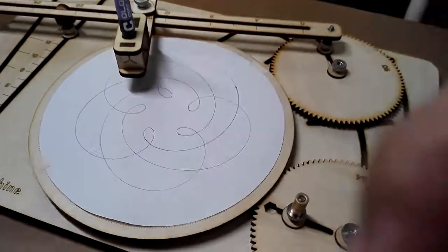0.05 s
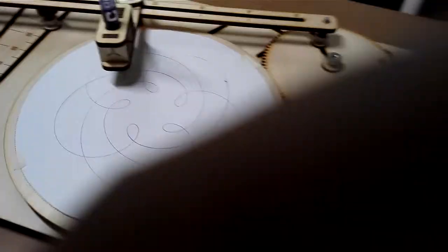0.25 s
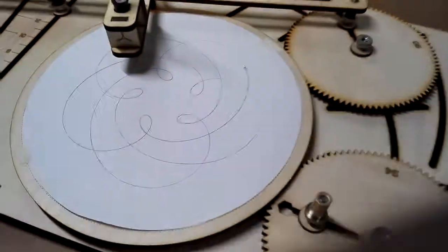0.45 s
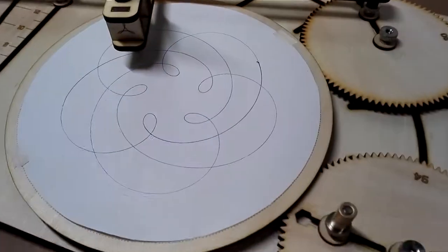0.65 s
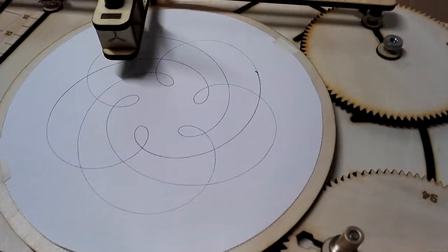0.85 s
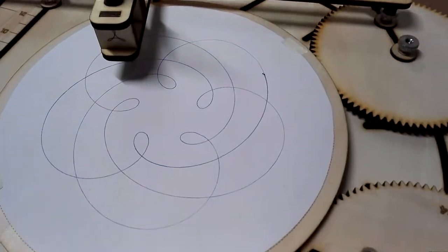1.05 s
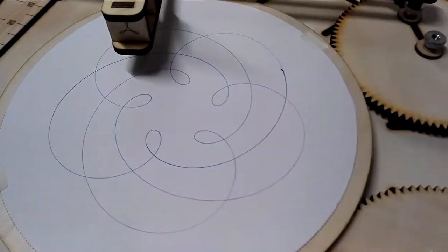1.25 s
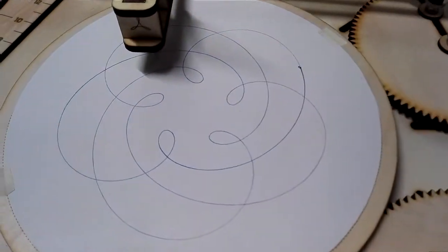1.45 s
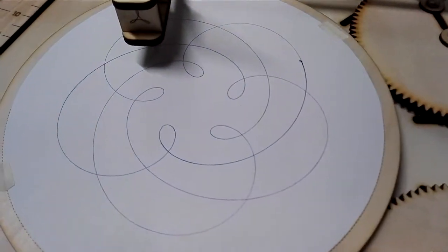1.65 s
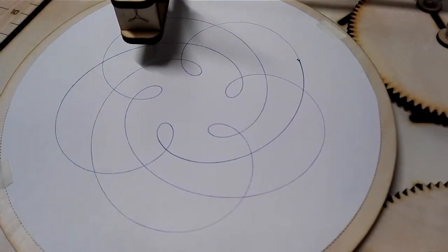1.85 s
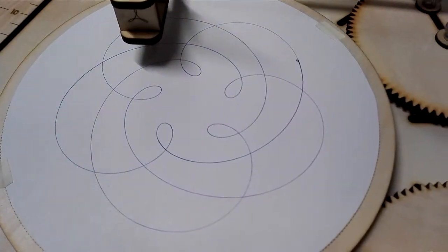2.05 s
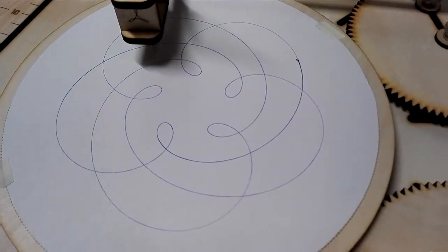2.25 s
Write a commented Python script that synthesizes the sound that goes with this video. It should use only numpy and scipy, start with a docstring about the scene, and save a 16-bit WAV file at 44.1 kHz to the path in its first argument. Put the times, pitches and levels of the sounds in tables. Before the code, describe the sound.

Close handling noise on a camera opens with a light brush, then a firm scrape with sharp clicks, a soft thump and more brushing, louder on the right. It soon gives way to the steady hiss of a quiet room.

```python
"""A quiet room, where a hand takes hold of a camera. Skin brushes and scrapes the case beside the
right microphone port (its opening), making noise out of many tiny slips. The case clicks, thumps
and rattles. The left port hears the hand later and duller, because the sound must go round the case.
Behind it all: hiss, room murmur, a low hum, a thin electrical whine, rumble, a faint throb and squeak."""
import sys
import numpy as np
from scipy import signal
from scipy.fft import rfft, irfft, next_fast_len
from scipy.io import wavfile
from scipy.ndimage import uniform_filter1d, map_coordinates

SR = 44100
rng = np.random.default_rng(int(sys.argv[2]) if len(sys.argv) > 2 else 0)


def persist_wave(psi):
    """Save psi, clipped to +-1, as 16-bit WAV."""
    counts = np.round(np.clip(psi, -1, 1) * 32767).astype(np.int16)
    wavfile.write(sys.argv[1], SR, np.atleast_2d(counts).T)


N = 101429
T = np.arange(N) / SR

# Tone colours of the background noises. Each row: frequency in Hz, relative level in dB.
MIC_HISS_COLOUR = [(30, -10), (150, -3), (450, -3.5), (800, -1.5), (1400, -1.5), (2500, -2.5), (3800, -3.5),
                   (5000, -7), (8500, -8.5), (12000, -12.5), (14000, -15)]
MURMUR_COLOUR = [(60, -10), (150, 0), (200, 2), (265, 5), (330, -3), (600, -3), (1000, 1), (1600, -2),
                 (2500, -13), (6000, -30)]
RUMBLE_COLOUR = [(8, 5.5), (25, 0), (50, 0), (72, -14), (98, -8), (140, -22), (260, -27), (450, -45),
                 (2000, -75)]
# The tones of the hum and whine. Each row: pitch in Hz, average level in dB.
HUM_AND_WHINE = [(119, -77), (257, -94), (3543, -83), (3601, -97), (7087, -101)]
# How the rumble and the throb rise and fall. Each row: time in seconds, level in dB.
RUMBLE_LEVELS = [(0, -66), (.2, -69), (.42, -75.5), (.65, -70), (.83, -73), (1.2, -78), (2.1, -76),
                 (2.3, -78)]
THROB_LEVELS = [(0, -69), (.2, -71), (.4, -80), (.65, -70), (.72, -80), (.83, -75), (1.2, -88), (1.47, -77),
                (1.75, -71), (1.87, -66.5), (2.02, -79), (2.13, -73), (2.3, -85)]
# Light brushes of skin. Each row: start, rise, hold and fade in seconds, then hiss level and
# hollow body level in dB.
BRUSHES = [(.202, 0.0074, .018, .027, -35, -46.5), (0.423, .006, .027, 0.055, -48.5, -61.5),
           (0.483, 0.034, 0.022, 0.022, -50.5, -73), (.54, .018, .015, 0.056, -44.5, -65.5),
           (.85, .04, .01, .07, -76, -105), (1.41, 0.038, .02, .06, -74, -105)]
# The firm scrape. Each row: time in seconds, body level in dB, hiss level in dB.
SCRAPE_LEVELS = [(.272, -115, -115), (.28, -58, -58), (.295, -48, -47), (.312, -46, -43), (.328, -40, -38),
                 (.342, -31.5, -28.5), (.355, -26, -24.5), (.36, -30, -28), (.365, -25, -24),
                 (.371, -34, -28), (.385, -42, -31), (.391, -58, -51), (.41, -115, -115)]
# Tone colours of the rubbing skin. Each row: frequency in Hz, relative level in dB.
BRUSH_HISS_COLOUR = [(500, -45), (2000, -27), (2700, -11), (4200, -4.5), (5800, 0), (6800, -4), (9000, -4),
                     (11000, -14), (12500, -21.5), (14500, -22)]
BRUSH_BODY_COLOUR = [(200, -27), (500, -20), (800, -6.5), (1120, -15), (1550, -0.5), (2000, -12),
                     (2500, -7), (3800, -5), (8000, -22)]
SCRAPE_BODY_COLOUR = [(60, -55), (160, -34), (290, -17), (450, -22), (720, -14), (850, -15), (1170, 0),
                      (1300, -7), (1390, -1), (1520, -5), (1680, 3), (1830, -5), (2050, -1), (2380, 1),
                      (2800, -13), (5000, -30)]
SCRAPE_HISS_COLOUR = [(100, -60), (400, -32), (1500, -13), (3000, -7), (3900, 0), (4400, -2.5), (5100, 2),
                      (6000, -3), (7500, -10), (10000, -18), (12000, -23), (14000, -21)]
# Clicks of the case. Each row: start in seconds, peak in dB, then centre, width and treble limit in Hz,
# then rattle level, thump peak and the click's extra level towards the left port in dB.
CLICKS = [(.2720, -8.5, 5440, 4150, 9260, -28, -40, -3), (0.3193, -12.5, 4400, 5500, 9500, -56, -60, 4),
          (0.3625, -11, 1600, 2400, 6000, -60, -75, -5), (0.4068, -14.5, 1120, 800, 3200, -70, -90, -1),
          (0.5072, -21, 5200, 1200, 6860, -62, -34.5, 0), (0.521, -37, 5200, 700, 7000, -81, -80, -3)]
# Where the rattling case rings. Each row: pitch in Hz, width in Hz, gain in dB.
CASE_RINGS = [(1200, 600, -3), (2099, 600, 1), (3730, 495, -1), (5136, 290, 3), (6342, 900, -4),
              (7384, 700, -9)]
# How the way round the case dulls the sound. Each row: frequency in Hz, gain in dB.
CASE_SHADOW = [(40, 0), (200, -2), (700, -4), (1200, -13), (2400, -15), (3200, -8), (3900, -5), (5200, -17),
               (7000, -25), (10000, -26), (14000, -23)]


def undb(db):
    """Turn decibels into a gain to multiply by."""
    return 10 ** (np.asarray(db) / 20)


def unit(x):
    """Scale a sound to an average (rms) level of 1."""
    return x / np.sqrt(np.mean(x ** 2))


def curve(rows):
    """Join rows of seconds and dB into one gain curve for each level column."""
    times, *levels = np.array(rows).T
    return [undb(np.interp(T, times, db)) for db in levels]


def swell(start, rise, hold, fade, db):
    """A gain that rises, holds and fades softly; times are in seconds."""
    rising = np.clip((T - start) / rise, 0, 1)
    fading = np.clip(1 - (T - start - rise - hold) / fade, 0, 1) ** 1.5
    return undb(db) * rising * fading


def decay(start, fall_s):
    """A gain that jumps to 1, then falls to about a third every fall_s seconds."""
    return (T >= start) * np.exp(-np.maximum(T - start, 0) / fall_s)


def colour(x, points):
    """Filter a sound through rows of Hz and dB."""
    size = next_fast_len(2 * N, True) // 2 * 2
    hz, db = np.array(points).T
    freqs = np.maximum(np.arange(size // 2 + 1) * SR / size, 1)
    gains = undb(np.interp(np.log(freqs), np.log(hz), db))
    cepstrum = irfft(np.log(gains))
    # Folding it in half makes the filter ring only after a sound, never before.
    cepstrum[1:size // 2] *= 2
    cepstrum[size // 2 + 1:] = 0
    return irfft(rfft(x, size) * np.exp(rfft(cepstrum)))[:N]


def resonate(x, hz, width):
    """Let a sound ring around one pitch, with gain 1 at the centre."""
    angle = 2 * np.pi * hz / SR
    damping = np.sin(angle) * width / hz / 2
    return signal.lfilter([damping, 0, -damping], [1 + damping, -2 * np.cos(angle), 1 - damping], x + 1e-18)


def lowpass(x, hz):
    """Soften the treble above hz."""
    return signal.sosfilt(signal.butter(4, hz, fs=SR, output="sos"), x + 1e-18)


def noise():
    """White noise."""
    return rng.standard_normal(N)


def wander(per_s):
    """A random drift, about 1 in size, that changes course per_s times a second."""
    step = int(SR / per_s)
    stairs = np.repeat(rng.standard_normal(N // step + 1), step)
    return unit(uniform_filter1d(stairs, step)[:N])


def tone(hz):
    """A pure tone of average level 1 that follows a moving pitch."""
    return np.sqrt(2) * np.sin(2 * np.pi * np.cumsum(hz) / SR)


def late(x, lag_s=.00054):
    """Delay a sound by its travel time from one port to the other."""
    return map_coordinates(x, [(T - lag_s) * SR], mode="nearest")


def mic_hiss(db=-75):
    """Each of the two microphones makes its own steady hiss."""
    return undb(db) * np.array([unit(colour(noise(), MIC_HISS_COLOUR)) for _ in range(2)])


def room_murmur(db=-80):
    """The room's soft noise reaches the right port first."""
    murmur = undb(db) * unit(colour(noise(), MURMUR_COLOUR))
    return np.array([late(murmur), murmur])


def hum_and_whine():
    """A low hum and a thin electrical whine waver slightly in level and pitch."""
    return sum(undb(db + .7 * wander(8)) * tone(hz + .9 * wander(10)) for hz, db in HUM_AND_WHINE)


def rumble():
    """Deep noise slowly rises and falls."""
    return curve(RUMBLE_LEVELS)[0] * unit(colour(noise(), RUMBLE_COLOUR))


def throb(hz=40):
    """A deep, unsteady tone comes and goes."""
    gain = curve(THROB_LEVELS)[0] * undb(1.2 * wander(12.05))
    return gain * tone(hz + 1.16 * wander(7))


def friction(slips_per_s=5000, spread_db=4, smooth_share=.6, flutter_db=1.32):
    """Sliding skin makes tiny slips over a smooth hiss, fluttering as the grip changes."""
    slips = (rng.random(N) < slips_per_s / SR) * noise() * undb(spread_db * noise())
    sliding = np.sqrt(smooth_share) * noise() + np.sqrt(1 - smooth_share) * unit(slips)
    return sliding * undb(flutter_db * wander(350))


def brushes():
    """Skin brushes the case lightly: a hiss with a hollow body sound under it."""
    hiss = unit(colour(friction(), BRUSH_HISS_COLOUR))
    body = unit(colour(friction(), BRUSH_BODY_COLOUR))
    return sum(swell(*timing, hiss_db) * hiss + swell(*timing, body_db) * body
               for *timing, hiss_db, body_db in BRUSHES)


def scrape():
    """One firm scrape of skin builds up and dies away."""
    body_gain, hiss_gain = curve(SCRAPE_LEVELS)
    body = unit(colour(friction(), SCRAPE_BODY_COLOUR))
    hiss = unit(colour(friction(), SCRAPE_HISS_COLOUR))
    return body_gain * body + hiss_gain * hiss


def clicks(thump_hz=57.5):
    """Each contact sends a sharp pulse left and right, with a low thump as the case gives way."""
    both = np.zeros((2, N))
    for start, db, hz, width, top_hz, _, thump_db, left_db in CLICKS:
        tap = 1. * (np.arange(N) == int(start * SR))
        pulse = lowpass(resonate(tap, hz, width), top_hz)
        both += undb([[db + left_db], [db]]) * pulse / np.abs(pulse).max()
        both += undb(thump_db) * decay(start, fall_s=.006) * np.cos(2 * np.pi * thump_hz * (T - start))
    return both


def rattle():
    """The case chatters and rings briefly after each click."""
    chatter = lowpass(friction(), hz=8000)
    ring = unit(sum(undb(db) * resonate(chatter, hz, width) for hz, width, db in CASE_RINGS))
    return ring * sum(undb(db) * decay(start, fall_s=.009) for start, _, _, _, _, db, _, _ in CLICKS)


def judder(hz=1600, width_hz=1100):
    """The finger judders at the height of the scrape, in one short burst."""
    broad = resonate(friction(), hz, 2 * width_hz)
    narrow = unit(resonate(broad, hz, width_hz))
    return swell(start=.361, rise=.0008, hold=.0057, fade=.0056, db=-19.5) * narrow


def squeak(hz=8930, wander_hz=90):
    """A very faint, high tone with a wandering pitch swells once."""
    return swell(start=.82, rise=.08, hold=.2, fade=.08, db=-92) * tone(hz + wander_hz * wander(16))


def handling():
    """All the rubbing and rattling, made from fresh noise on each call."""
    return brushes() + scrape() + rattle() + judder()


def scene(scattered_share=.49, echo_db=-38):
    """The right port hears the hand directly, the left round the case; the room answers faintly."""
    direct, scattered = handling(), handling()
    clicks_left, clicks_right = clicks()
    far_side = clicks_left + np.sqrt(1 - scattered_share) * direct + np.sqrt(scattered_share) * scattered
    left = late(colour(far_side, CASE_SHADOW))
    right = direct + clicks_right
    tails = [noise() * decay(0, fall_s=.033) for _ in range(2)]
    echo = np.array([signal.fftconvolve(left, tail / np.linalg.norm(tail))[:N] for tail in tails])
    background = mic_hiss() + room_murmur() + hum_and_whine() + rumble() + throb() + squeak()
    return np.array([left, right]) + undb(echo_db) * echo + background


def record(dry):
    """The camera sharply cuts the highest treble."""
    top_hz = 14400
    return signal.sosfilt(signal.ellip(8, .2, 70, top_hz, fs=SR, output="sos"), dry)


dry = scene()
out = record(dry)
persist_wave(out)
```